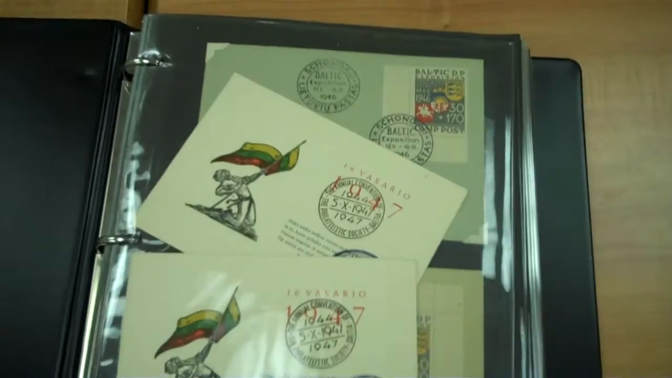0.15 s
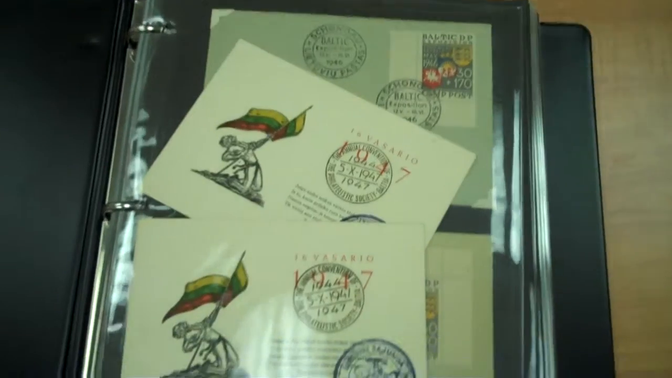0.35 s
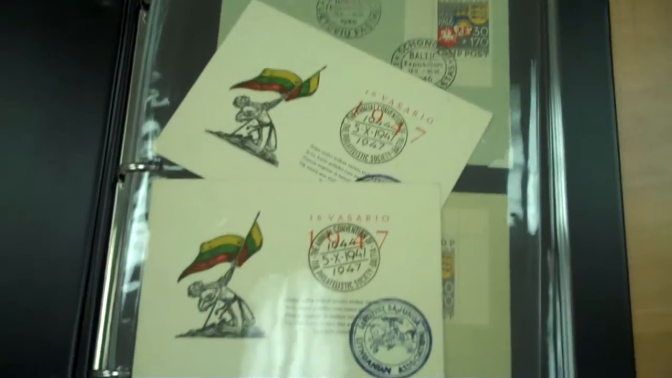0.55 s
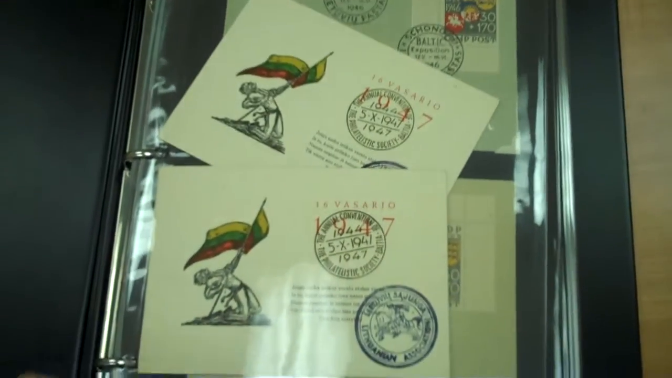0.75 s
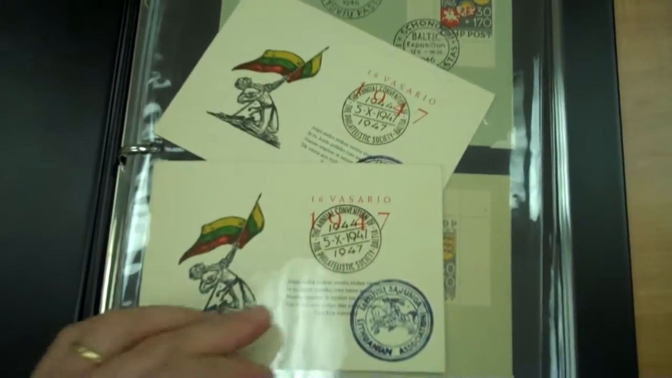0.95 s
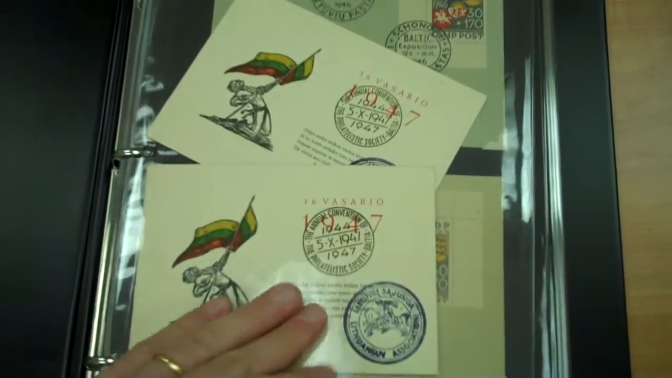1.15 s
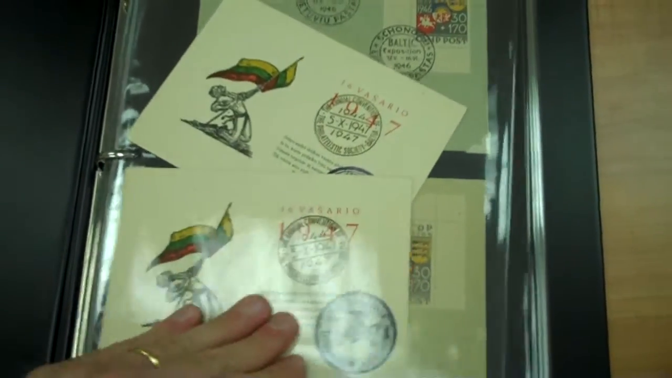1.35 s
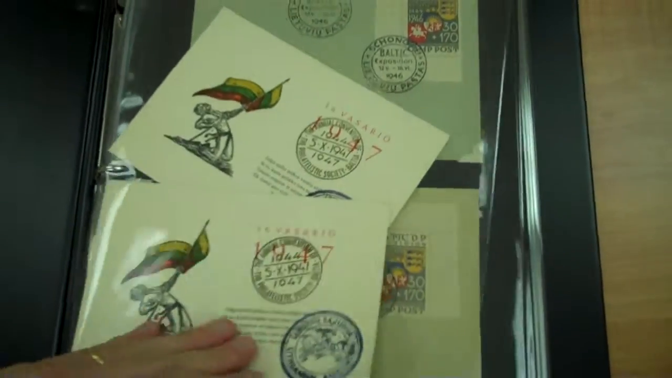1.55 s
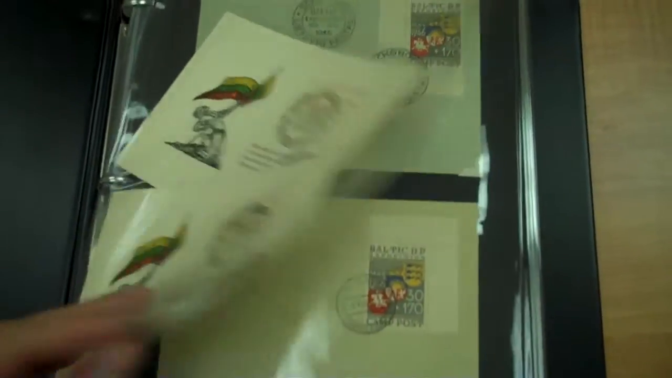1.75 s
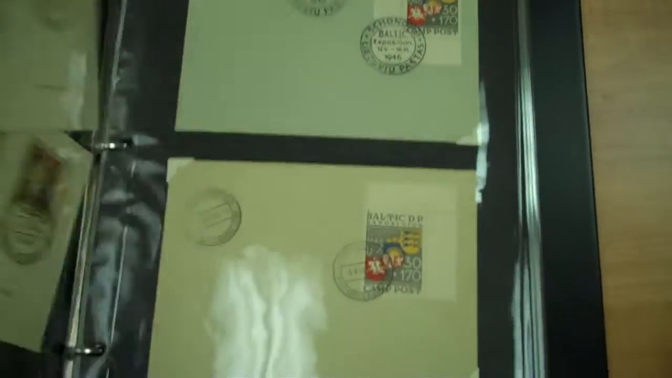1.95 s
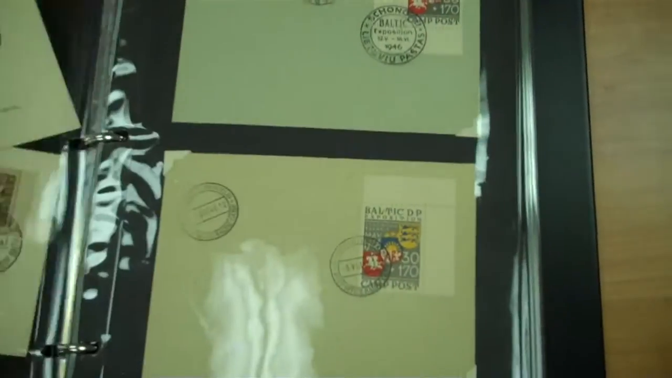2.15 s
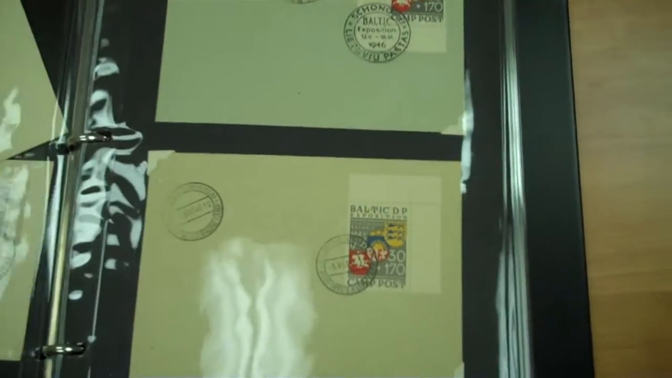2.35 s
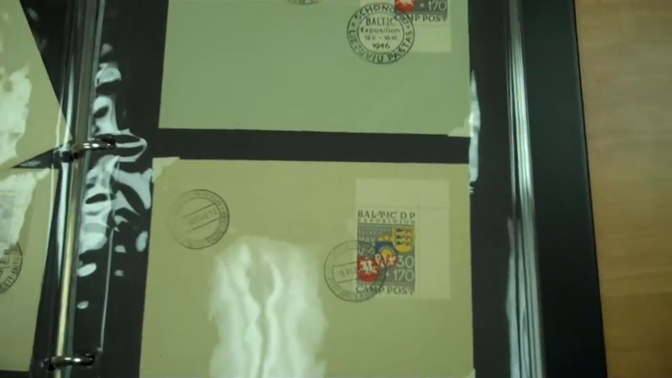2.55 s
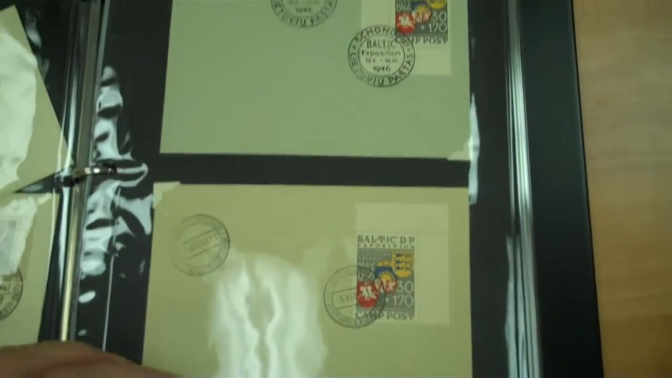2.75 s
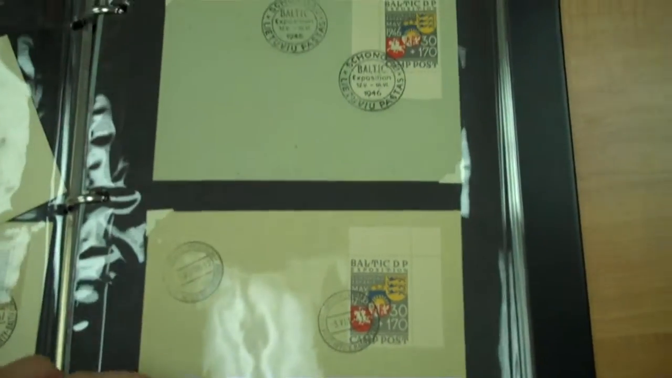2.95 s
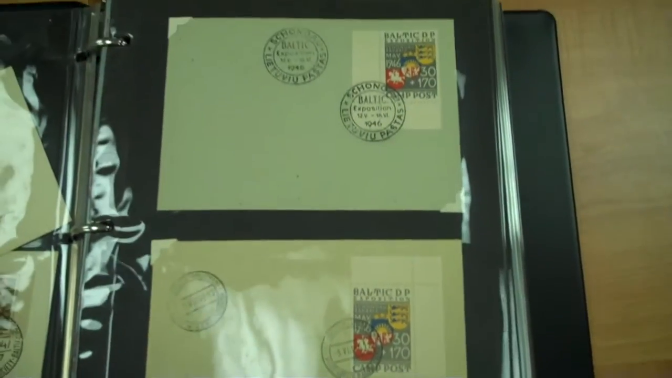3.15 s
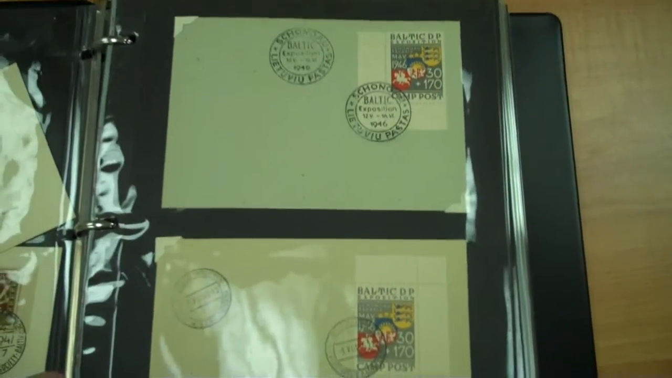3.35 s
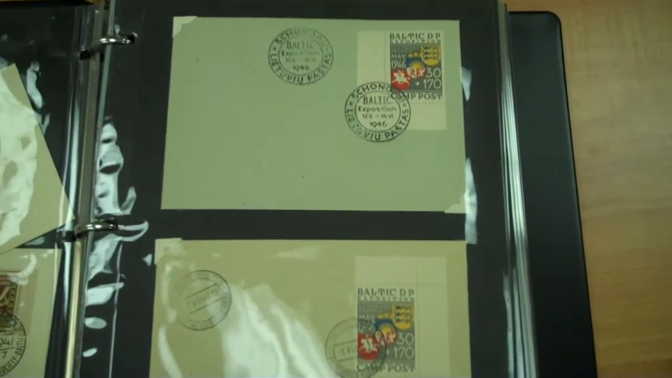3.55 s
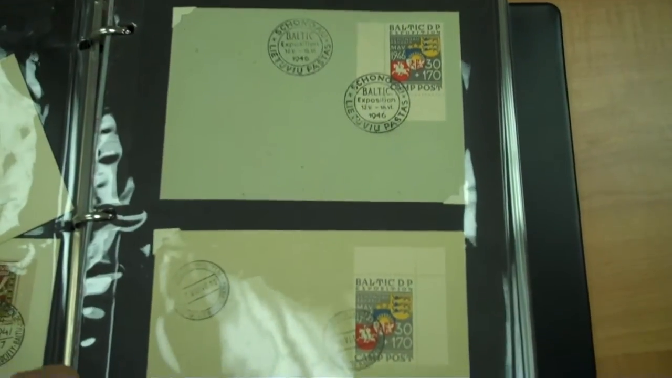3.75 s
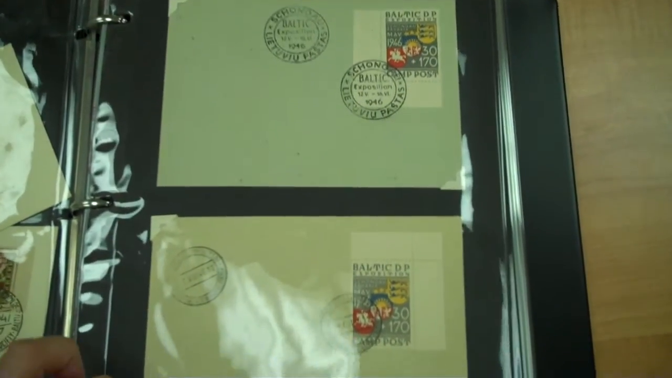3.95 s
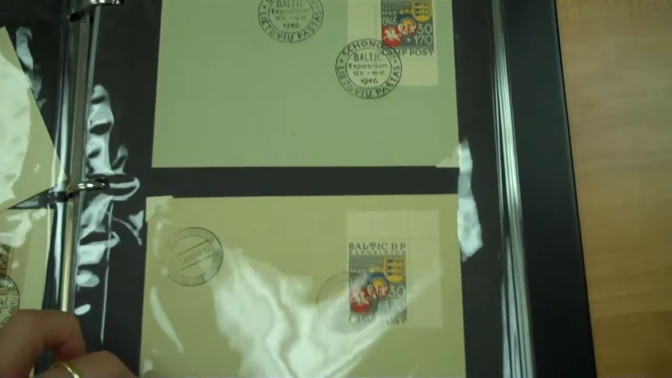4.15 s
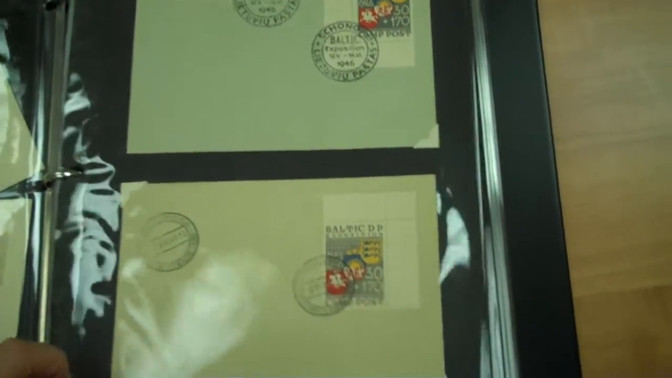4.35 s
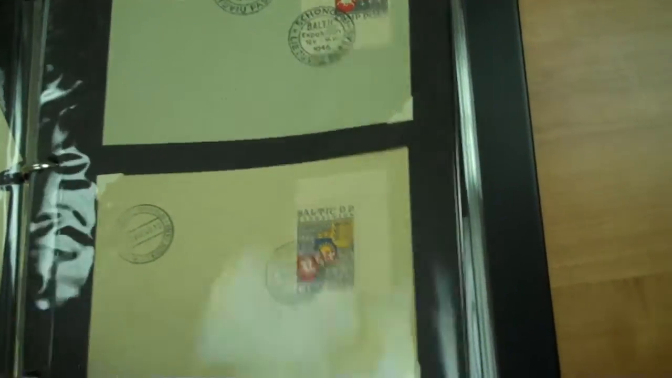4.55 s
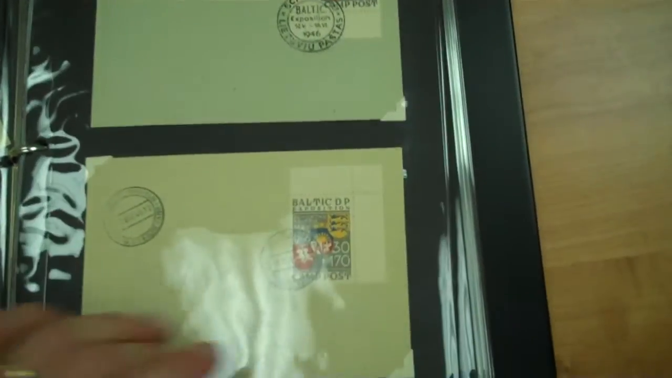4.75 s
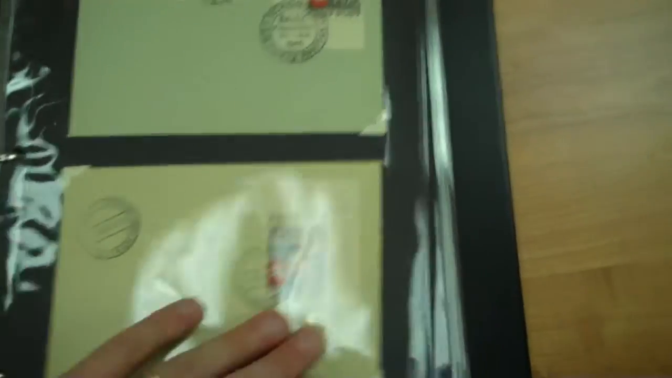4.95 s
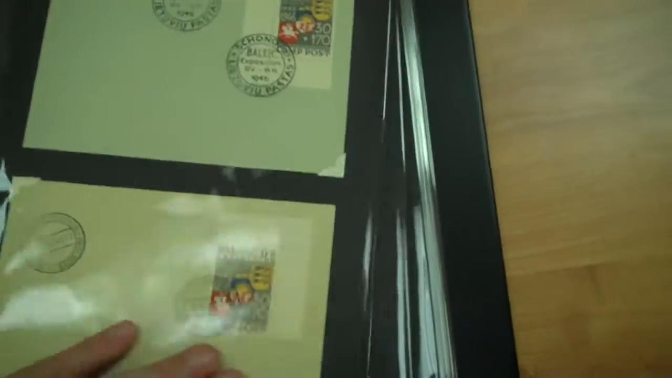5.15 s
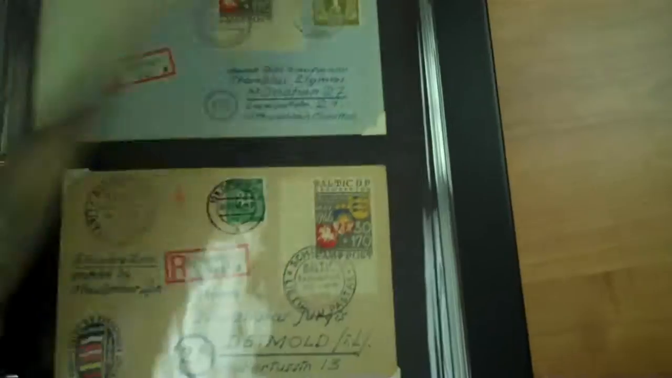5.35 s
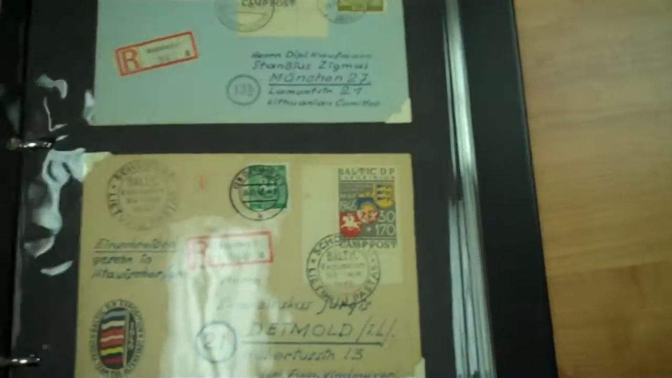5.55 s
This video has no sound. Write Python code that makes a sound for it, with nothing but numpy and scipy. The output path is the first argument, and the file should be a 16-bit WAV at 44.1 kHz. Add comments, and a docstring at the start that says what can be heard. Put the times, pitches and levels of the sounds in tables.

```python
"""At a desk in a small, quiet room, plastic sleeves in a ring-binder album are turned by hand.
A hand brushes the page, then two sleeves are lifted and laid over. Sharp snaps are short kicks through
resonances; the slide is many tiny noise grains in a fine crackle and rustle; dull, fading puffs of noise
give the low thuds. The brush is smooth noise ringing in the page. Diffuse echoes surround the album;
room air, hiss and a faint mains hum lie behind."""
import sys
import numpy as np
from scipy import signal
from scipy.io import wavfile

SR = 44100
rng = np.random.default_rng(int(sys.argv[2]) if len(sys.argv) > 2 else 0)


def master_out(mix):
    """Clip the mix to full scale and print it as 16-bit PCM to the path in sys.argv[1]."""
    frames = np.transpose(np.atleast_2d(mix))
    ceiling = np.clip(frames, -1, 1)
    pcm = np.round(ceiling * 32767).astype(np.int16)
    wavfile.write(sys.argv[1], SR, pcm)


N = 247401
TIME = np.arange(N) / SR
SIDES = np.array([[1], [-1]]) / 2  # a left-over-right level in dB, shared between the channels


def buckle(hz, width_hz, flutter, flutter_s, low_hz, size=900):
    """One jump of the film and its dying flutter through a resonance; unit power over a millisecond."""
    t = np.arange(size) / SR
    shared, left, right = rng.standard_normal((3, size))
    push = flutter * (shared + 0.36 * np.array([left, right])) * np.exp(-t / flutter_s)
    push[:, 0] += 1  # the jump itself
    ring = passed(resonate(push, hz, width_hz), low_hz, "high")
    energy = np.sum(ring ** 2) / 2
    return ring / np.sqrt(energy / (SR / 1000))


def crease_flip(hz, crack_trim_db=-1.5, tick_trim_db=-16.5):
    """A crease flips with a bright crack and a thin tick on top."""
    crack = buckle(hz, width_hz=2200, flutter=0.1564, flutter_s=0.0014, low_hz=4130)
    crack = passed(crack, 9400, "low")
    tick = buckle(12950, width_hz=5000, flutter=0.16, flutter_s=0.0005, low_hz=8000)
    # tighter creases crack higher and tick more: 25.5 dB per octave; the tick leans 3 dB left
    tick = tick * from_db(25.5 * np.log2(hz / 7500) + 3.0 * SIDES)
    return crack * from_db(crack_trim_db) + tick * from_db(tick_trim_db)


def sheet_answer(hz, body_level, flex_level, body_trim_db=1.0, flex_trim_db=1.5):
    """The sheet around the crease answers lower and longer, with a body ring and a low flex."""
    body = buckle(hz, width_hz=1840, flutter=0.28, flutter_s=0.0022, low_hz=1200)
    body = passed(body, 4400, "low", order=4)
    # a different patch of the sheet flexes each time
    flex_hz = 1200 * 2 ** rng.normal(0, 0.15)
    flex = buckle(flex_hz, width_hz=1100, flutter=0.15, flutter_s=0.0025, low_hz=480)
    flex = passed(flex, 2500, "low")
    return body * from_db(body_level + body_trim_db) + flex * from_db(flex_level + flex_trim_db)


# the film buckles audibly; levels are before the trims of crack, body and flex:
# [t/s, crack level/dB, crack f/Hz, body level/dB, body f/Hz, flex level/dB]
SNAPS = [(1.333, -40.5, 7150, -54, 3300, -65), (1.3645, -29, 7800, -42, 3800, -53),
         (1.374, -40, 6550, -38, 3600, -49), (1.4109, -35.5, 8200, -52, 2780, -50),
         (1.4852, -44, 7300, -40, 3700, -61), (1.5026, -24.5, 8400, -34, 3820, -60),
         (1.5084, -13.5, 8200, -24, 3650, -47), (1.5339, -7.5, 8070, -13, 3377, -26.5),
         (1.5758, -35, 7000, -31.5, 2616, -46), (1.6033, -27.5, 7800, -34.5, 3180, -49),
         (1.677, -27.5, 7060, -24.5, 3500, -35.5), (1.8151, -45, 6600, -28, 3400, -37),
         (1.8487, -25.5, 6600, -32, 3200, -29.5), (1.8666, -10, 7140, -38, 3700, -33),
         (1.898, -17, 7800, -29, 2900, -46), (1.9052, -7.5, 7500, -33.5, 3500, -38),
         (1.911, -4.5, 6000, -18.5, 4000, -38), (1.9333, -9.5, 6500, -35, 3100, -30.5),
         (1.9605, -15, 6360, -27, 4200, -33.5), (1.9634, -11.5, 6460, -20, 3300, -24.5),
         (1.9805, -26, 6560, -23, 3310, -30), (2.0559, -23.5, 6000, -21, 4000, -35),
         (2.1033, -27, 7740, -40, 2700, -48), (2.149, -32, 7260, -35.5, 3400, -53),
         (2.1556, -24.5, 7440, -46, 3600, -41), (2.194, -31, 7800, -38, 3500, -40),
         (2.2056, -24.5, 7200, -35.5, 3500, -57), (2.2444, -33.5, 7800, -53.5, 2870, -41),
         (2.271, -22, 9300, -48, 3200, -37.5), (2.327, -30, 7650, -40, 3520, -39),
         (2.3907, -36, 7200, -53, 3520, -36), (3.1832, -49.5, 7500, -59.5, 3100, -58),
         (3.6574, -57.5, 7900, -50, 2470, -55), (4.1117, -39, 7100, -62, 3600, -66),
         (4.193, -38.5, 7000, -43, 3300, -44.5), (4.2102, -40, 7700, -43, 3100, -44.5),
         (4.24, -33.5, 7300, -39.5, 3700, -37.5), (4.2528, -33.5, 7500, -36.5, 3130, -44.5),
         (4.4261, -29.5, 7160, -45.5, 3500, -46), (4.4453, -32, 7700, -50, 3500, -50),
         (4.4946, -19.5, 7150, -26, 3725, -36.5), (4.604, -57.5, 6900, -34.5, 3400, -43.5),
         (4.6834, -23.5, 7000, -27.5, 3100, -28), (4.6892, -8.5, 7200, -18.5, 4000, -25),
         (4.691, -9, 7550, -31, 3500, -28), (4.6966, -16, 7350, -25, 3070, -31.5),
         (5.0956, -29, 7700, -49, 3600, -49), (5.0991, -38, 6700, -33, 2870, -42),
         (5.2592, -36, 7100, -42, 3070, -38), (5.278, -23.5, 7700, -46, 2480, -38.5),
         (5.2987, -24.5, 8100, -51, 3700, -50), (5.3054, -32, 7400, -39, 2290, -35.5),
         (5.3566, -11, 8570, -34, 2980, -26), (5.4024, -24, 7400, -27, 2170, -26.5),
         (5.4442, -35, 7500, -32.5, 3100, -37), (5.4673, -25, 6050, -30.5, 3260, -32.5),
         (5.4906, -9.5, 7100, -36, 3498, -27), (5.4987, -23, 7600, -25.5, 2700, -26.5),
         (5.515, -32, 7770, -37, 3100, -31.5)]


def snaps(crease_pan_db=4.5, sheet_pan_db=1.0):
    """Film under tension buckles suddenly: each crease flips and shakes the sheet around it."""
    out = np.zeros((2, N))
    for s, crack_level, crack_hz, body_level, body_hz, flex_level in SNAPS + small_creases():
        crease = crease_flip(crack_hz) * from_db(crack_level)
        sheet = sheet_answer(body_hz, body_level, flex_level)
        pan_db = crease_pan_db + rng.normal(0, 1)
        crease = crease * rms_one(from_db(pan_db * SIDES))
        add(out, s, crease + sheet * from_db(sheet_pan_db * SIDES))
    return out


# strokes of film sliding on film; levels are before the trims of crackle and rustle:
# [start t/s, length t/s, crackle level/dB, rustle level/dB]
# Fingers find the edge, the first sleeve peels off, swings over, lands and settles.
# Fingers find the next edge, it is pried loose and drops back, is lifted, swings over, lands and settles.
STROKES = [(1.359, 0.021, -47.5, -59), (1.463, 0.053, -49.5, -67), (1.53, .075, -41.5, -52),
           (1.635, 0.05, -40.5, -50), (1.793, .07, -53, -60), (1.879, .1, -36.5, -43.5),
           (2.052, 0.048, -39, -48), (2.172, 0.043, -45, -55), (2.299, 0.05, -48.5, -54.5),
           (2.384, 0.061, -45, -54), (2.448, 0.056, -49.5, -59), (4.198, 0.014, -53.5, -57.5),
           (4.378, .04, -59.5, -73), (4.432, 0.13, -50, -59.5), (4.606, 0.056, -49.5, -58),
           (4.689, 0.013, -29, -39), (5.104, 0.08, -49, -56.5), (5.275, 0.09, -50, -57.5),
           (5.366, 0.11, -51, -55.5), (5.487, 0.027, -31, -37.5), (5.574, 0.027, -47, -56)]
# a held sleeve keeps creeping between strokes: [start t/s, length t/s]
HOLDS = [(1.36, 1.15), (4.43, .3), (5.1, .5)]
# tone of the fine crackle: [f/Hz, relative level/dB per Hz]
CRACKLE_COLOUR = [(2000, -33.5), (3800, -10.5), (5000, 3), (6500, 3.5), (7900, 1), (9500, -2),
                  (11500, -12.5), (15000, -12.5)]
# tone of the sheet rustle: [f/Hz, relative level/dB per Hz]
RUSTLE_COLOUR = [(150, -19.5), (400, -11), (800, -0.5), (1600, 0.5), (3500, 0.5), (5000, 1.5), (9000, -23)]
# stereo image of the film, for slide and brush:
# [f/Hz, left-right likeness (1 = same), left over right level/dB]
FILM_IMAGE = [(200, 1, -3), (1213, 0.84, 2), (4370, 0.7, 2.5), (8000, .3, 7), (13910, 0.2014, 4.5)]


def sliding(crackle_trim_db=-2.1, rustle_trim_db=4.0):
    """In each stroke the sleeves stick and slip against each other in many small steps."""
    typical_s, rise_db_per_s, fall_db_per_s = 0.044, 650, 479
    creep = sum(swell(start_s, length_s, rise_db_per_s, fall_db_per_s) for start_s, length_s in HOLDS)
    crackle_gain = creep * from_db(-56.5 + crackle_trim_db)
    rustle_gain = creep * from_db(-66 + rustle_trim_db)
    for start_s, length_s, crackle_level, rustle_level in STROKES:
        haste = np.sqrt(typical_s / length_s)  # shorter strokes are more abrupt
        motion = swell(start_s, length_s, haste * rise_db_per_s, haste * fall_db_per_s)
        crackle_gain = np.maximum(crackle_gain, motion * from_db(crackle_level + crackle_trim_db))
        rustle_gain = np.maximum(rustle_gain, motion * from_db(rustle_level + rustle_trim_db))
    slips = grains(per_s=399, spread_db=2.5, grain_s=0.001, smooth=0.5)
    crackle = coloured(slips, CRACKLE_COLOUR, FILM_IMAGE) * crackle_gain
    rustle = coloured(slips[::-1], RUSTLE_COLOUR, FILM_IMAGE) * rustle_gain
    return crackle + rustle


def grains(per_s, spread_db, grain_s, smooth):
    """Tiny slips of uneven size, each a brief puff of noise, over smooth friction."""
    sizes = from_db(spread_db * np.minimum(rng.exponential(1, N), 3))
    born = rng.random(N) < per_s / SR
    power = signal.lfilter([1], [1, -np.exp(-1 / (grain_s * SR))], born * sizes ** 2)
    return white() * np.sqrt(power / power.mean() + smooth)


def small_creases(per_s=75, over_db=5.5, spread_db=4.5, crack_hz=7360, body_hz=3250):
    """Small creases give way while the film slides, at levels tied to the stroke; columns of SNAPS."""
    rows = []
    for start_s, length_s, crackle_level, rustle_level in STROKES:
        places, chances = rng.random(16), rng.standard_normal((16, 3))
        for k, (place, (bright, dull, pitch)) in enumerate(zip(places, chances)):
            after_s = (k + place) / per_s
            if after_s < length_s:
                crack_level = crackle_level + over_db + spread_db * bright
                body_level = rustle_level + over_db + spread_db * dull
                tightness = 2 ** (0.16 * pitch)  # spread in octaves
                rows.append((start_s + after_s, crack_level, crack_hz * tightness,
                             body_level, body_hz * tightness, body_level - 5))
    return rows


# dull low puffs: first the brushing hand's low tail; a short knock at 1.814 s;
# the others are the sheet swinging or landing: [t/s, level/dB at the start, fade t/s, f/Hz]
LOW_PUFFS = [(.985, -51, 0.088, 278), (1.814, -39.5, 0.019, 650), (1.964, -47, 0.044, 440),
             (2.05, -54, 0.11, 500), (2.189, -51.5, 0.091, 587), (2.27, -53, 0.13, 610),
             (2.389, -49.5, 0.029, 900), (4.688, -54.5, 0.026, 520), (5.401, -50, 0.038, 700),
             (5.498, -44, 0.024, 286)]


def low_puffs(relative_width=0.78):
    """Broad resonant noise that fades: the hand's low tail, a short knock, the sheet swinging or landing."""
    out = np.zeros((2, N))
    t = np.arange(SR // 2) / SR
    for s, db, fade_s, hz in LOW_PUFFS:
        puff = resonate(rng.standard_normal(len(t)), hz, hz * relative_width)
        puff = rms_one(passed(puff, 3 * hz, "low"))
        add(out, s, (puff * from_db(db) * np.exp(-t / fade_s))[None])
    return out


# tone of skin on plastic: [f/Hz, relative level/dB per Hz]
BRUSH_COLOUR = [(100, -6.5), (250, -3.5), (600, -5.5), (1500, 1), (3000, 1), (4800, -3), (7500, 1),
                (10500, -14), (15000, -24)]
# the brushed page rings: [f/Hz, width f/Hz, relative level/dB]
PAGE_MODES = [(237.2, 69, -6), (351.3, 90, -8.5), (988, 76, -12), (2020, 88, -5.5), (3330, 160, -6.5),
              (5800, 160, -17)]


def brush(friction_db=-41.0, ring_db=-44.5):
    """Smooth friction of skin on plastic, ringing in the page; the hand lands, rubs and slows."""
    friction = coloured(white(), BRUSH_COLOUR, FILM_IMAGE)
    ring = sum(from_db(db) * rms_one(resonate(friction, hz, width)) for hz, width, db in PAGE_MODES)
    rub = swell(start_s=0.95, hold_s=0.023, rise_db_per_s=2800, fall_db_per_s=220)
    return rub * (from_db(friction_db) * friction + from_db(ring_db) * ring)


# room reverberation: [f/Hz, 60 dB decay t/s, level/dB per band]
ROOM = [(250, 0.66, -13.5), (1000, 0.43, -21), (4000, 0.18, -13.5), (8000, 0.26, -18), (14000, .2, -15)]


def room(x, first_echo_s=0.0013, build_s=0.0035, size=22000):
    """Diffuse echoes build up quickly and die away at a rate set for each band."""
    t = np.arange(size) / SR
    noise = rng.standard_normal((2, 2, size))
    # the two close microphones share part of every echo
    noise = rms_one(noise + 0.63 * noise[:, ::-1])
    onset = 1 - np.exp(-np.maximum(t - first_echo_s, 0) / build_s)
    response = 0
    for k, (low, hz, high) in enumerate(bands()):
        t60, level_db = at_hz(ROOM, hz)
        fade = onset * np.exp(-np.log(1000) * t / t60)
        fade = fade / np.linalg.norm(fade) * from_db(level_db)
        response = response + passed(noise[k % 2], [low, high], "band") * fade
    return signal.fftconvolve(x, response, axes=1)[:, :N]


# microphone ports, left then right:
# [resonance f/Hz, width f/Hz, added resonance level/dB, treble roll-off f/Hz]
PORTS = [(7800, 770, 3.5, 14500), (7350, 1200, 2.5, 8840)]


def ports(x):
    """Each small microphone port rings in the treble and dulls what lies above."""
    heard = []
    for side, (hz, width, lift_db, top_hz) in zip(x, PORTS):
        ringing = side + from_db(lift_db) * resonate(side, hz, width)
        heard.append(passed(ringing, top_hz, "low"))
    return np.array(heard)


# tone of the room air: [f/Hz, relative level/dB per Hz]
AIR_COLOUR = [(25, -24.5), (55, -13), (85, -13), (140, -11), (350, -13.5), (500, -14.5), (750, -17.5),
              (1000, -18), (1500, -20.5), (2500, -23), (5000, -26.5), (14000, -32.5)]
# stereo image of the room air: [f/Hz, left-right likeness (1 = same), left over right level/dB]
AIR_IMAGE = [(59.8, 0.68, -8), (250, .9, 1.5), (700, 0.48, 1.5), (1500, .3, 3.5), (3200, 0, 2),
             (14000, 0, 0)]
# faint tones in the room air: [f/Hz, width f/Hz, level/dB]
AIR_TONES = [(502.3, 21, -72.5), (932, 18, -75.5), (1512, 8.9, -77.5)]
# mains hum: [f/Hz, level/dB before panning]
HUM = [(59.5, -76), (119.9, -65.5), (239.8, -73.5), (359.7, -69.5)]


def background(air_db=-57.5, hiss_db=-69.5, hum_pan_db=-2.0):
    """Steady room air with faint wavering tones, a narrow band of microphone hiss and the mains hum."""
    air = from_db(air_db) * coloured(white(), AIR_COLOUR, AIR_IMAGE)
    tones = sum(from_db(db) * rms_one(resonate(rng.standard_normal(N), hz, width))
                for hz, width, db in AIR_TONES)
    hiss = from_db(hiss_db) * rms_one(resonate(rng.standard_normal((2, N)), 7850, width_hz=700))
    hum = sum(np.sqrt(2) * from_db(db) * np.sin(2 * np.pi * (hz * TIME + rng.random())) for hz, db in HUM)
    return air + tones + hiss + hum * from_db(hum_pan_db * SIDES)


def from_db(db):
    """Decibels to gain."""
    return 10 ** (np.asarray(db) / 20)


def rms_one(x):
    """Scale to unit power."""
    return x / np.sqrt(np.mean(x ** 2) + 1e-20)


def at_hz(rows, hz):
    """Each column of a frequency table at one frequency, read along a log-frequency axis."""
    f, *columns = np.transpose(rows)
    return [np.interp(np.log(hz), np.log(f), c) for c in columns]


def passed(x, hz, kind, order=2):
    """Butterworth filter."""
    return signal.sosfilt(signal.butter(order, hz, kind, fs=SR, output="sos"), x)


def resonate(x, hz, width_hz):
    """Two-pole resonance with gain of about 1 on top."""
    r = np.exp(-np.pi * width_hz / SR)
    feed = np.array([1, 0, -1]) * (1 - r * r) / 2
    return signal.lfilter(feed, [1, -2 * r * np.cos(2 * np.pi * hz / SR), r * r], x)


def bands(count=25):
    """(low, centre, high) in Hz of the bands between log-spaced edges."""
    edges = np.geomspace(25, 16500, count)
    return [(low, np.sqrt(low * high), high) for low, high in zip(edges, edges[1:])]


def white():
    """Two mid-side pairs of smooth noise."""
    return rng.standard_normal((2, 2, N))


def coloured(excitation, colour, image):
    """Shape two mid-side pairs of excitation band by band into stereo; rms 1."""
    out = 0
    for k, (low, hz, high) in enumerate(bands()):
        # neighbouring bands take turns with the two pairs
        mid, side = passed(excitation[k % 2], [low, high], "band")
        alike, pan_db = at_hz(image, hz)
        pair = np.sqrt(1 + alike) * mid + np.sqrt(1 - alike) * side * [[1], [-1]]
        out = out + pair * from_db(at_hz(colour, hz)[0] + pan_db * SIDES)
    return rms_one(out)


def swell(start_s, hold_s, rise_db_per_s, fall_db_per_s):
    """Gain that rises to 1 at the start, holds and dies away."""
    before_db = np.maximum(start_s - TIME, 0) * rise_db_per_s
    after_db = np.maximum(TIME - start_s - hold_s, 0) * fall_db_per_s
    return from_db(-np.minimum(before_db + after_db, 120))


def add(out, s, sound):
    """Mix a short sound in at time s."""
    start = int(round(s * SR))
    out[:, start:start + sound.shape[1]] += sound[:, :N - start]


def scene():
    """The album close by, in its room."""
    album = snaps() + sliding() + low_puffs() + brush()
    return ports(album + room(album)) + background()


def record(dry):
    """The sharpest snaps are rounded off just under full scale; the top is cut."""
    rounded = dry / (1 + np.abs(dry / 0.92) ** 6) ** (1 / 6)
    top_cut = signal.ellip(10, 0.1, 80, 14300, fs=SR, output="sos")
    return signal.sosfilt(top_cut, rounded)


dry = scene()
out = record(dry)
master_out(out)
```